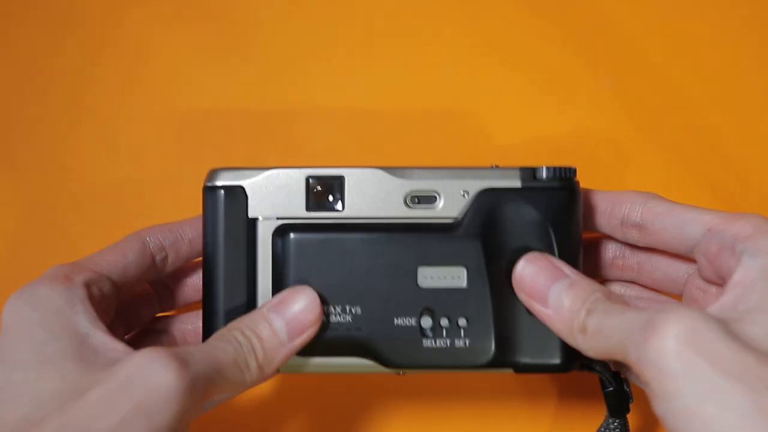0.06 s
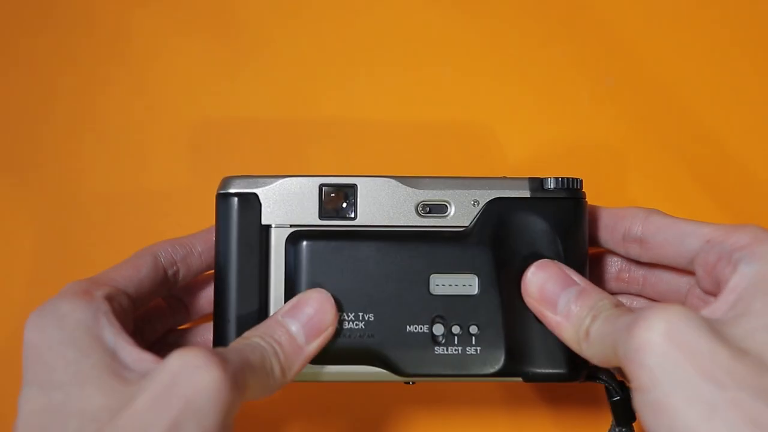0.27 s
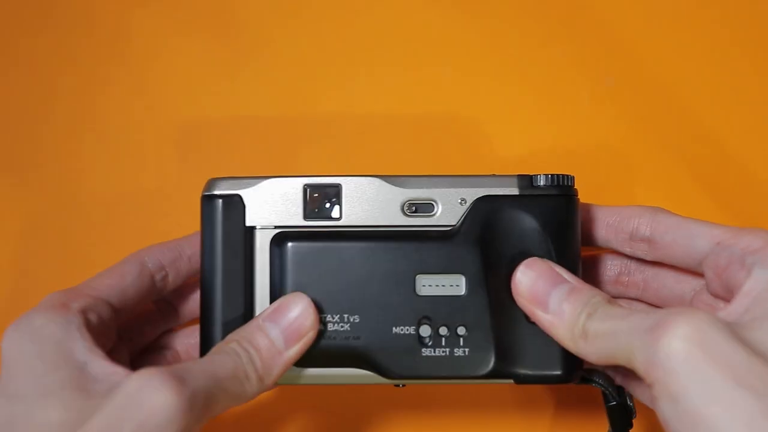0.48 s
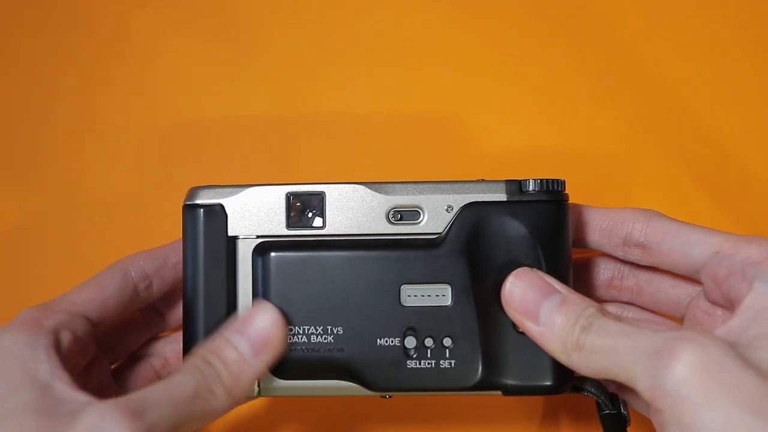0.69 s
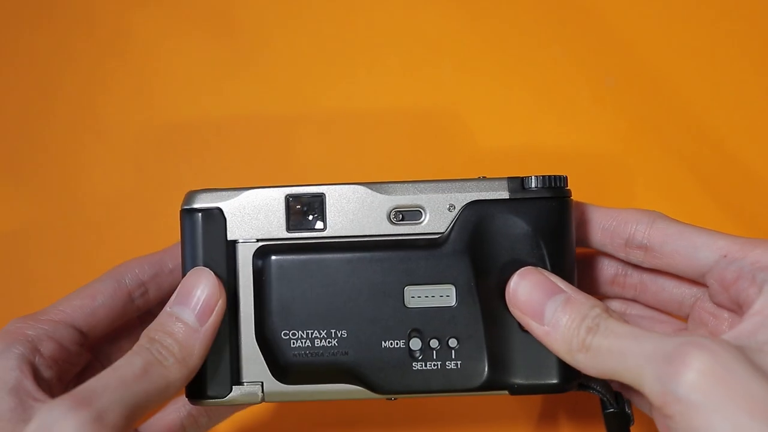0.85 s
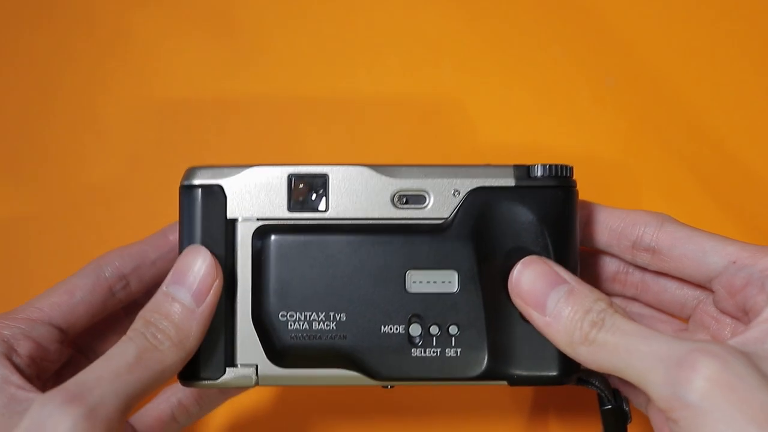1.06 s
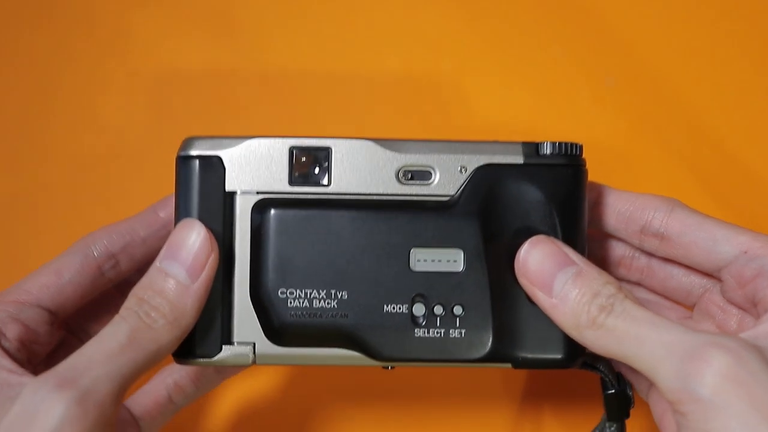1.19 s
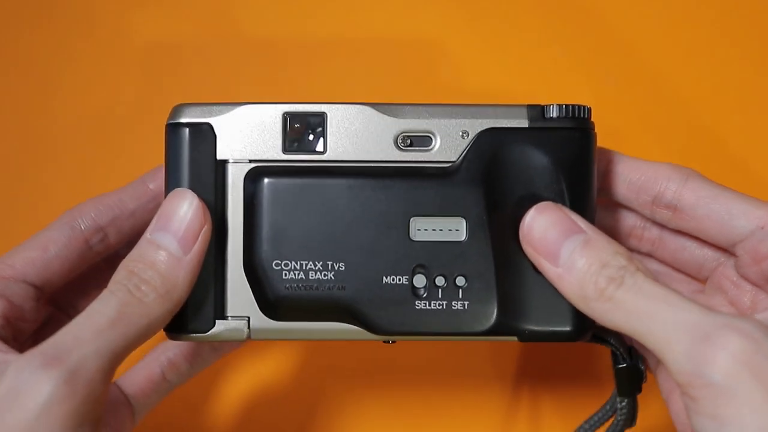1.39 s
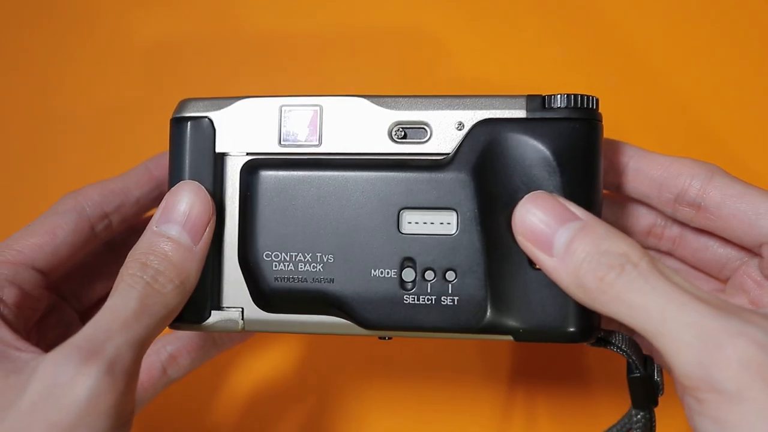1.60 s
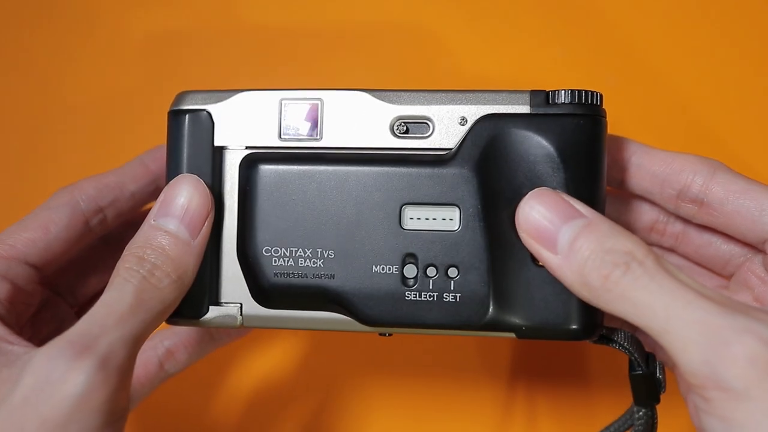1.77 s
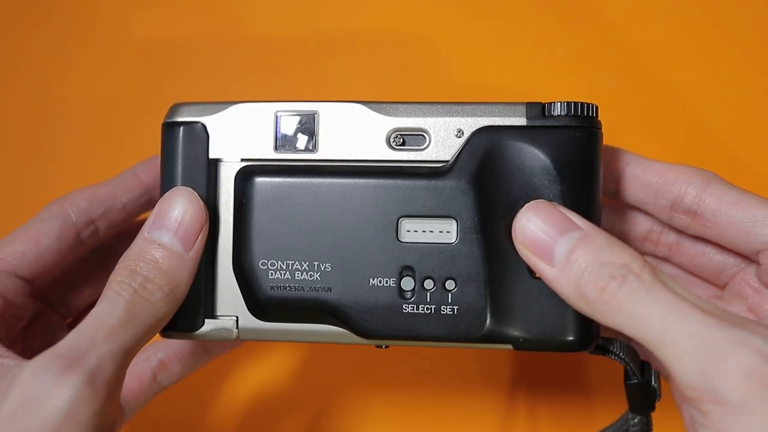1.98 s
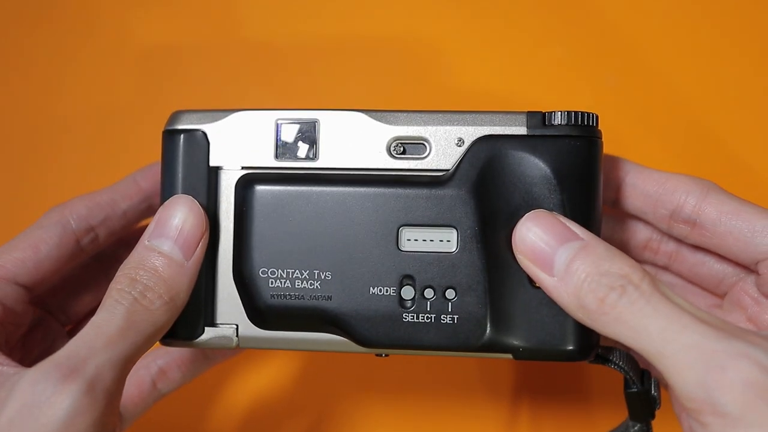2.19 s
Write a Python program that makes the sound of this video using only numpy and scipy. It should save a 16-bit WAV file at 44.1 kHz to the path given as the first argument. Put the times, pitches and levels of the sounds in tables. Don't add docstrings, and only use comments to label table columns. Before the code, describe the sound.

Compact camera's door latch clicks loudly shut, followed by a thin, buzzing motorized film wind.

```python
import sys
import numpy as np
from scipy import signal
from scipy.fft import rfft, irfft
from scipy.io import wavfile

SR = 44100
rng = np.random.default_rng(int(sys.argv[2]) if len(sys.argv) > 2 else 0)


def boost(x):
    u = np.asarray(x, float) / 20
    return 10 ** u


def output_pcm(signal):
    pcm = np.clip(np.atleast_2d(signal).T, -1, 1) * 32767
    wavfile.write(sys.argv[1], SR, np.round(pcm).astype(np.int16))


N = 99225
TIME_S = np.arange(N) / SR
BIN_HZ = np.arange(N // 2 + 1) * SR / N


def rms_one(x):
    return x / np.sqrt(np.mean(x ** 2) + 1e-20)


def in_time(rows):
    s, *columns = np.transpose(rows)
    return [np.interp(TIME_S, s, c) for c in columns]


def drift(rate_hz):
    r = np.exp(-2 * np.pi * rate_hz / SR)
    wander = signal.lfilter([1], [1, -2 * r, r * r], rng.standard_normal(N + 9000))
    return rms_one(wander[9000:])


def colour(x, spectrum, peaks=()):
    spectrum_hz, spectrum_db = np.transpose(spectrum)
    hz = np.maximum(BIN_HZ, 1)
    db = np.interp(np.log(hz), np.log(spectrum_hz), spectrum_db)
    for peak_hz, width_hz, peak_db in peaks:
        db = db + peak_db / (1 + (2 * (hz - peak_hz) / width_hz) ** 2)
    return rms_one(irfft(rfft(x) * boost(db), N))


def ring(x, hz, t60):
    r, w = boost(-60 / (t60 * SR)), 2 * np.pi * hz / SR
    return signal.lfilter([0, np.sin(w)], [1, -2 * r * np.cos(w), r * r], x + 1e-18)


def click_at(s):
    click = np.zeros(N)
    click[int(s * SR)] = 1
    return click


def band(x, hz, octaves, order=1):
    edges = np.clip(hz * 2. ** (np.array([-.5, .5]) * octaves), 30, .45 * SR)
    return signal.sosfilt(signal.butter(order, edges, "band", fs=SR, output="sos"), x)


def thin(x):
    return signal.sosfilt(signal.butter(4, 600, "high", fs=SR, output="sos"), x)


def dips(x, table):
    for hz, width, depth in table:
        peak = signal.lfilter(*signal.iirpeak(hz, hz / width, fs=SR), x)
        x = x - np.clip(depth, 0, 1) * peak
    return x


def struck(hits, modes):
    s, db = np.transpose(hits)
    chance_db = rng.normal(0, 1.5, (len(s), len(modes)))
    out = np.zeros(N)
    for k, (hz, mode_db, t60) in enumerate(modes):
        clicks = np.zeros(N)
        clicks[(s * SR).astype(int)] = boost(db + mode_db + chance_db[:, k])
        out = out + (-1) ** k * ring(clicks, hz, t60)
    return out


# t/s, hum level/dB, gear level/dB, mesh share level/dB
MOTOR = [(.27, -91, -62, -6), (.36, -63, -40.5, -38), (.43, -47.5, -43.5, -2), (.47, -61, -38, -6),
         (.69, -51, -36.5, -4.5), (.79, -61.5, -33.5, -9.5), (.89, -46, -34.5, -8),
         (1.06, -46.5, -33.5, -0.5), (1.12, -40.5, -32.5, -4), (1.3, -40.5, -30.5, -3.5),
         (1.5, -40, -29, -5.5), (1.7, -39, -29, -2), (1.9, -41, -29, -3), (2.1, -42.5, -30, -4),
         (2.135, -39, -30.5, -7), (2.155, -58, -31.5, -25), (2.19, -82, -33.5, -29), (2.25, -88, -35, -29)]
# t/s, f/Hz
SPEED = [(.27, 300), (.38, 458), (.44, 534), (.5, 495.5), (.63, 498), (.7, 493.5), (.82, 491), (.95, 509),
         (1.03, 502), (1.2, 509), (1.5, 520), (1.56, 514.5), (1.9, 523.5), (1.99, 516.5), (2.095, 516),
         (2.13, 455), (2.165, 396), (2.25, 290)]
FULL_SPEED_HZ = 490


def motor():
    hz, = in_time(SPEED)
    hum_db, gear_db, mesh_db = in_time(MOTOR)
    turn = 2 * np.pi * np.cumsum(hz) / SR
    slow_hz = np.maximum(FULL_SPEED_HZ - hz, 0)
    on = np.clip((TIME_S - MOTOR[0][0]) / 0.079 + .5, 0, 1)
    hum = boost(hum_db - .4 * slow_hz) * rotor_hum(turn)
    whine = boost(0.26 * (mesh_db + 12.0)) * brush_whine(hz, turn)
    mesh = boost(mesh_db + 3.5) * tooth_mesh(hz, turn, slow_hz)
    gears = boost(gear_db) * (whine + mesh + boost(-5.0) * gear_rattle(turn))
    return on * np.sqrt(2) * (hum + gears)


HUM_ORDERS = [1, 1.5, 2, 2.5, 3, 3.5, 4]
HUM_DB = [-1, -71, -20.5, -21, -21, -9.5, -44]


def rotor_hum(turn):
    hum = np.zeros(N)
    for order, db in zip(HUM_ORDERS, HUM_DB):
        phase = order * (turn + 0.54 * drift(7.7)) + rng.uniform(0, 7.4)
        hum += boost(db + 0.98 * drift(10.4)) * np.sin(phase)
    loaded_s, idle_db = 0.71, -19
    idle = np.clip((loaded_s - TIME_S) / 0.04, 0, 1)
    wobble_db = -20 + idle_db * idle + 1.6 * drift(7.4)
    return hum + boost(wobble_db) * np.sin(turn / 2 + 0.35 * drift(21))


MESH_ORDERS = [1.75, 2.22, 3, 3.72, 3.84, 4.5, 4.7, 5, 6.38, 6.55, 6.71, 6.875, 7.045, 7.21, 9.62, 10.1,
               10.5, 21]
MESH_DB = [-36.5, -28, -20, -21.5, -18.5, -21, -15.5, -36, -23, -17, -5, -11.5, -12.5, -13.5, -18.5, -24,
           -13, -46]


def tooth_mesh(hz, turn, slow_hz):
    mesh = np.zeros(N)
    for order, db in zip(MESH_ORDERS, MESH_DB):
        wander = 2 * np.pi * np.cumsum(.001 * drift(25.0) * hz) / SR
        level_db = db + 2.16 * drift(12.0) - (order > 9) * .5 * slow_hz
        mesh += boost(level_db) * np.sin(order * (turn + wander) + rng.uniform(0, 6.73))
    return mesh


# f/Hz, level/dB per Hz
SHELL = [(180, -89), (300, -71), (468, -47), (509, -14), (984, -18), (3570, 0), (4280, -3), (5390, -13),
         (15500, -32)]
# f/Hz, width/Hz, level/dB
SHELL_PEAKS = [(585, 20, 15), (747, 24, 15), (830, 69, 13), (1104, 34, 11.5), (1690, 780, 4),
               (2500, 60, 7.5), (3845, 200, -3.5), (3870, 190, 6), (4240, 270, -8), (5420, 430, 10),
               (6760, 270, 5.5), (937, 210, -22), (383, 67, -16), (200, 100, -3)]


def gear_rattle(turn):
    grains_per_s, spread_db, shaft_ratio = 6000, 2, 1 / 6
    hits = rng.random(N) < grains_per_s / SR
    size = boost(spread_db * np.minimum(rng.exponential(1, N), 4))
    grains = hits * size * rng.choice([-1, 1], N)
    throb = (1 + 0.033 * np.sin(turn / 2)) * (1 + 0.16 * np.sin(shaft_ratio * turn))
    throb = throb * boost(.5 * drift(20))
    rattle = patchy(colour(grains * throb, SHELL, SHELL_PEAKS))
    drag_hz, drag_width_hz, slack_db, catch_s, catch_rise_s = 814, 286, -26, 0.94, 0.0088
    drag = irfft(rfft(rattle) * np.exp(-((BIN_HZ - drag_hz) / drag_width_hz) ** 4), N)
    slack = np.clip((catch_s - TIME_S) / catch_rise_s, 0, 1)
    return rattle - slack * (1 - boost(slack_db)) * drag


def patchy(x):
    place = np.clip(3 * np.log2(np.maximum(BIN_HZ, 1) / 400), 0, 15)
    spectrum = rfft(x)
    out = np.zeros(N)
    for k in range(16):
        share = np.clip(1 - abs(place - k), 0, 1)
        swell_db = 1.3 * (1.5 * drift(0.68) + 0.84 * drift(5.5))
        out += boost(swell_db) * irfft(spectrum * share, N)
    return out


# f/Hz, level/dB re gears
CAN = [(3000, -64), (7000, -25.5), (8600, -39), (10100, -24), (11700, -32), (13200, -52), (15500, -76),
       (22000, -120)]


def brush_whine(hz, turn):
    cold_db, warm_s, warm_width_s = -14, 1.47, 0.15
    cold = cold_db / (1 + np.exp((TIME_S - warm_s) / warm_width_s))
    whine = np.zeros(N)
    for order in 13.5 + 3 * np.arange(10):
        db = np.interp(order * hz, *np.transpose(CAN)) + 2.0 * drift(45)
        db = db + (order == 19.5) * cold
        whine += boost(db) * np.sin(order * turn + 0.73 * drift(69))
    return whine


# t/s, level/dB
LATCH_HITS = [
    (.2021, -13),
    (.2039, -1),
    (.2047, -2),
    (.2055, -2),
    (.2063, -4),
    (.2071, -9),
]
# f/Hz, level/dB, t60/s
LATCH = [(625, -17, .04), (2143, -11, .012), (2490, -10, .012), (2850, -9, .01), (3150, -5, .009),
         (3420, -4, .009), (3640, -6, .009), (3965, -15, .075), (4620, -12, .02), (4900, -11, .009),
         (5450, -10, .009), (5770, -13, .016), (10300, -14, .006), (11600, -15, .008)]


def latch_snap():
    return struck(LATCH_HITS, LATCH)


SPRING_HZ = [1324.5, 2652, 3981, 4211]
# level/dB, t60/s
SPRING = [(-26.5, 2.2), (-34.5, 0.63), (-23.5, 0.19), (-32.5, 0.43)]
# t/s, level/dB
SPRING_SWELL = [(.204, -10), (.228, -5.5), (.27, -6.5), (.302, 0), (.435, -7), (.452, -17), (.6, -22)]


def latch_ring():
    click = click_at(SPRING_SWELL[0][0])
    spring = sum(boost(db) * ring(click, hz, t60) for hz, (db, t60) in zip(SPRING_HZ, SPRING))
    thump_db, thump_s = -20, 0.0023
    thump = np.convolve(click, np.hanning(int(thump_s * SR)))[:N]
    return spring * boost(in_time(SPRING_SWELL)[0]) + boost(thump_db) * thump


# t/s, peak level/dB, burst t60/s, centre f/Hz, width/octaves
KNOCKS = [(0.111, -53.5, 1, 1800, 4.1), (0.12, -53.5, 1, 2980, 5.6), (0.138, -18, 0.041, 1530, 0.27),
          (0.1387, -17, 0.038, 2740, 0.4), (0.1379, -20, 0.029, 6700, 1.24), (0.142, -31, 0.022, 4000, 2.8),
          (.1425, -21, .02, 6600, .2), (0.15, -32, 0.13, 2090, 1.76), (0.171, -50, 0.067, 2500, 3.2),
          (0.182, -38, 0.11, 398, 2), (0.1915, -43, 0.011, 8000, 2.3), (0.195, -34, 0.016, 400, 2.4),
          (0.2022, -9, 0.01, 4900, 0.53), (0.203, 4.5, 0.018, 4640, 1.93), (0.204, 0.5, 0.018, 10400, 0.35),
          (0.2075, -8.5, 0.07, 4200, 1.24), (0.2075, -19, 0.081, 10000, 1.1), (0.269, -50, 0.58, 70.5, 1.8),
          (0.2103, -19.5, 0.15, 3160, 1.92), (0.441, -26, 0.36, 4970, 0.3), (0.731, -22, 0.0053, 9500, 1.2),
          (0.7334, -14, 0.012, 7000, 1.8), (0.732, -29.5, 0.028, 1150, 0.22),
          (0.7335, -25, 0.021, 4750, 1.1), (.757, -37, 0.017, 10000, 1), (.955, -36.5, 0.22, 810, 0.4),
          (2.15, -38, 1, 1090, 0.16), (2.185, -31, 0.79, 1125, 0.25), (2.13, -20, 0.94, 3650, 0.11),
          (2.13, -26.5, 0.47, 5420, 0.097), (2.21, -22, .03, 5450, 0.16), (2.187, -18, 0.025, 3650, .12),
          (2.007, -15, .008, 3500, 0.44), (.335, -36.5, 1, 5300, 0.16), (0.379, -27.5, 0.9, 3620, 0.26)]
# f/Hz, level/dB
DOOR = [(600, -1.5), (1430, 8), (2150, 9), (2850, -11), (3300, -1.5), (3989, 0.5), (5600, 2.5), (6900, -4)]


def knocks():
    out, t = np.zeros(N + SR), np.arange(SR // 2) / SR
    crack_db, tail_db, tail_stretch, door_t60_s = 4, -42, 5.3, .009
    for s, db, t60, hz, octaves in KNOCKS:
        decay = boost(-60 * t / t60) + boost(tail_db - 60 * t / (tail_stretch * t60))
        burst = rng.standard_normal(len(t)) * decay
        rung = sum(boost(mode_db - 22) * ring(burst, mode_hz, door_t60_s) for mode_hz, mode_db in DOOR)
        start = int(s * SR)
        knock = band(rung + boost(crack_db) * burst, hz, octaves, order=2)
        out[start:start + len(t)] += boost(db - 4.5) * knock
    small = int(.6 * SR)
    out[small:] = thin(out[small:])
    return out[:N]


# f/Hz, level/dB, t60/s
TOUCH = [(1400, -15, .022), (2850, -23, .03), (600, -30, .05)]


def touch():
    click = click_at(.1381)
    return sum(boost(db) * ring(click, hz, t60) for hz, db, t60 in TOUCH)


# t/s, level/dB
PAWL_HITS = [
    (.7309, -25),
    (.7324, -19),
    (.7354, -26),
]
# f/Hz, level/dB, t60/s
PAWL = [(2350, -4, .006), (3100, -7, .006), (4250, 0, .006), (4750, 0, .006), (6500, -10, .004),
        (9000, -6, .005), (11000, -5, .004)]


def pawl_tick():
    return struck(PAWL_HITS, PAWL)


def strain():
    centre_s, width_s = 1.24, 0.22
    swell = np.exp(-((TIME_S - centre_s) / width_s) ** 2)
    return boost(-35) * swell * rms_one(band(rng.standard_normal(N), 2490, 0.43, order=2))


# t/s, level/dB
HANDS = [(0, -56), (.1, -67), (.13, -59), (.24, -57.5), (.33, -80), (.45, -80), (.52, -105), (2.1, -105),
         (2.15, -77), (2.25, -80)]
# f/Hz, level/dB per Hz
FLOOR = [(25, -2.5), (92, -34), (266, -8), (380, -32), (490, -17), (1000, -53), (4500, -53), (5500, -22),
         (6500, -54), (9000, -100)]


def hands():
    return boost(in_time(HANDS)[0] + 2.7 * drift(9.0)) * colour(rng.standard_normal(N), FLOOR)


# f/Hz, width/Hz, depth/0-1
DIPS = [(942, 780, 0.26), (384, 98, 1), (1640, 260, .4)]


def scene():
    let_go_s, fade_s = 2.25, .008
    fade = np.clip((let_go_s - TIME_S) / fade_s, .02, 1)
    blows = knocks() + thin(touch() + latch_snap() + pawl_tick())
    mix = motor() + dips(blows, DIPS) + latch_ring() + strain() + hands()
    return (fade * mix)[None]


# f/Hz, width/Hz, depth/0-1
HOLLOWS = [(970, 180, 1), (346, 59, 0.74)]


def hollow(x):
    return dips(x, HOLLOWS)


def roll_off(x):
    return signal.sosfilt(signal.butter(12, 15640, fs=SR, output="sos"), x)


def record(dry):
    overload = 1.0
    heard = hollow(np.clip(dry, -overload, overload))
    return roll_off(np.clip(heard, -overload, overload))


dry = scene()
out = record(dry)
output_pcm(out)
```